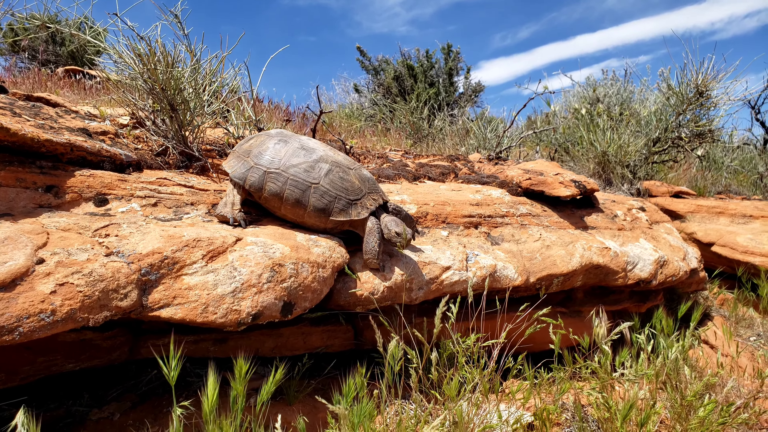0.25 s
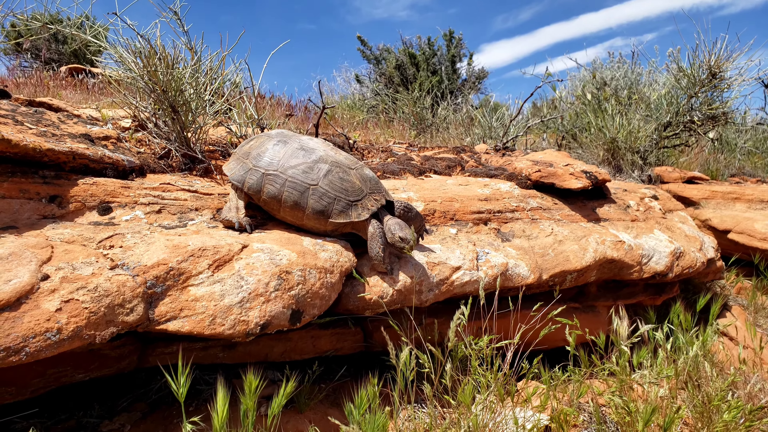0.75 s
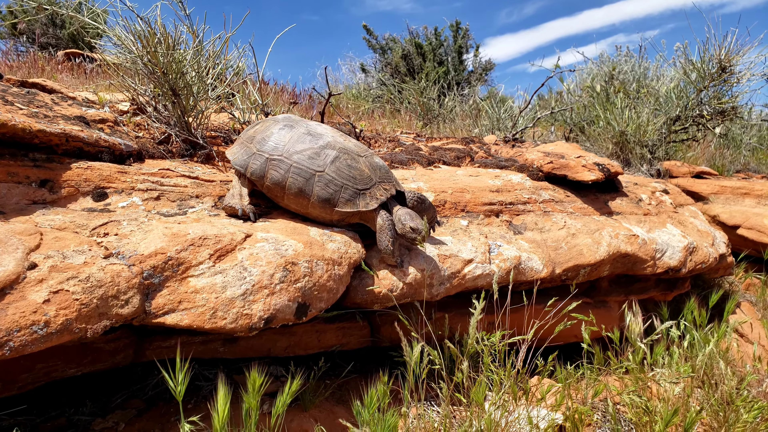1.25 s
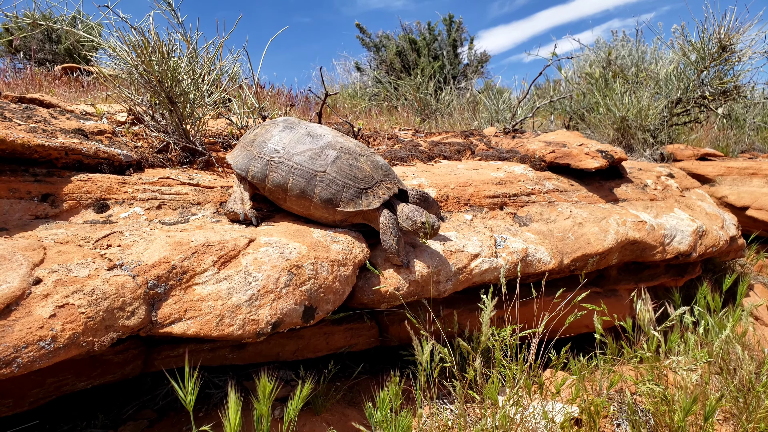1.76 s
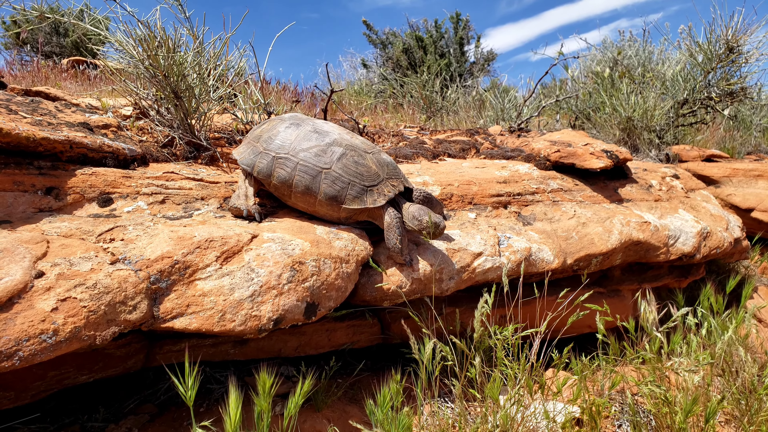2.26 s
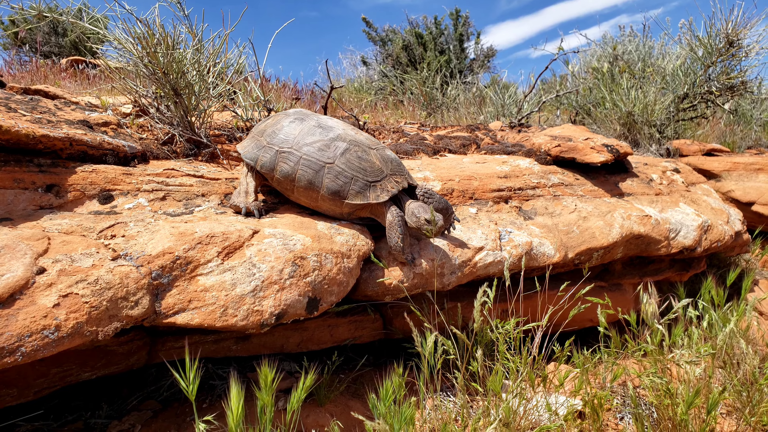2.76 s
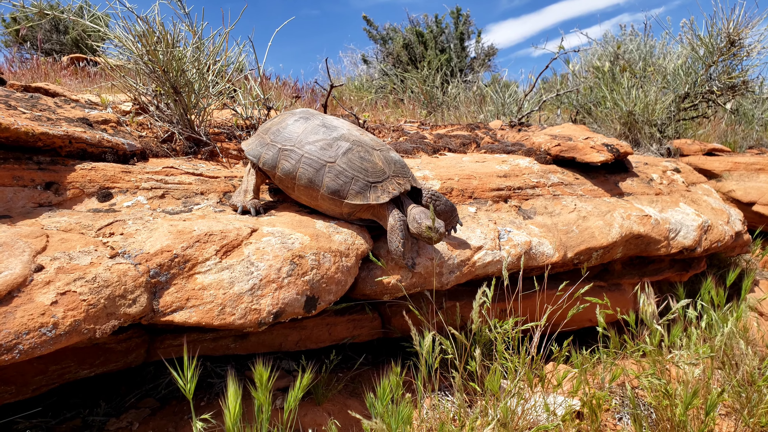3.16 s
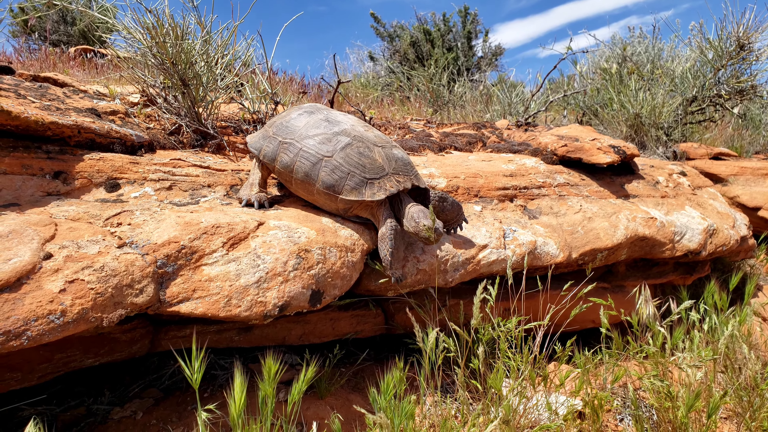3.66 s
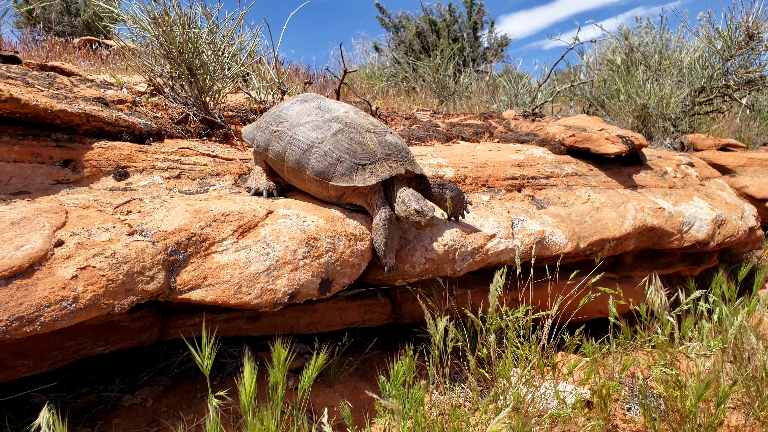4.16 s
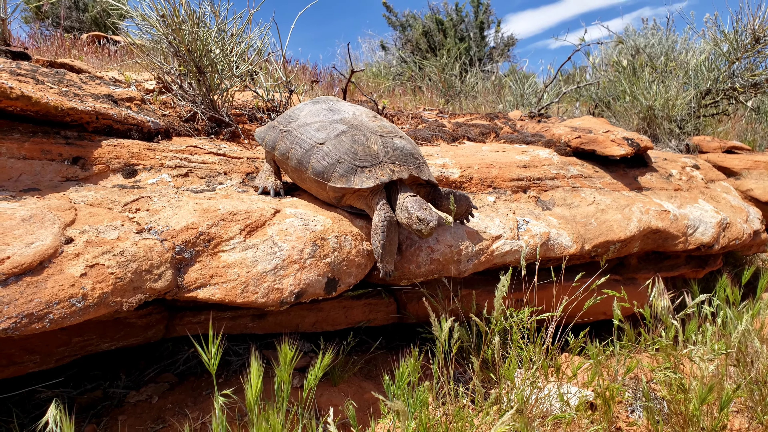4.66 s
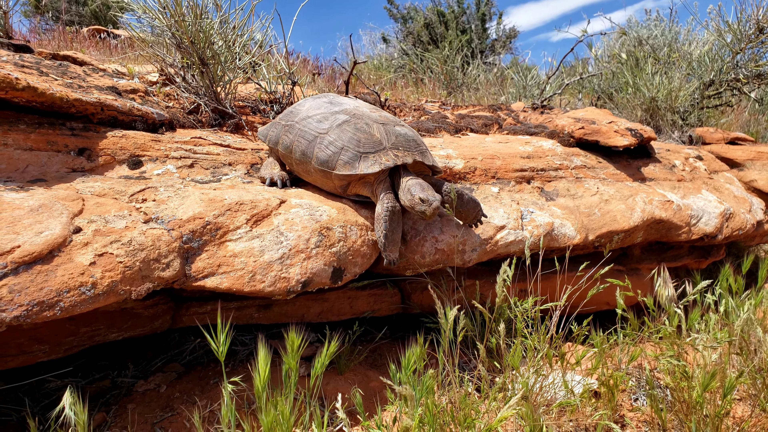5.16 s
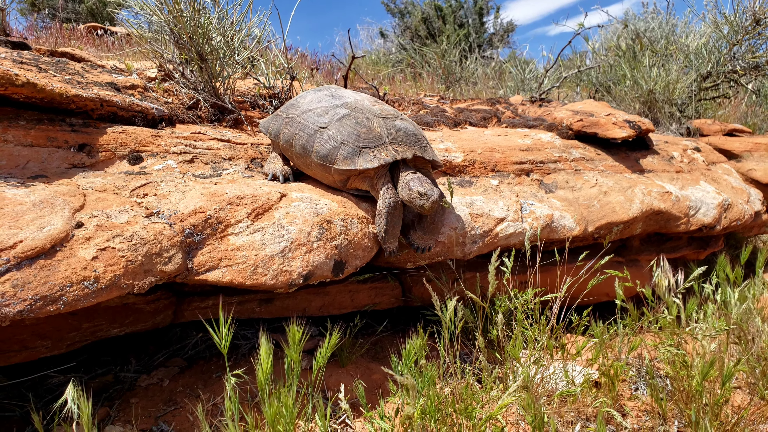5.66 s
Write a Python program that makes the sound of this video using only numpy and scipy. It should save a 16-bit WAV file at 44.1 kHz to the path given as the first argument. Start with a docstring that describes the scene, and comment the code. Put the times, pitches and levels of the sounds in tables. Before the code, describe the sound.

Quiet desert air with thin hiss, a faint wavering low drone and soft wind rumble. Close, dry claws skid and click on grainy rock: strongest at the very start, nearly silent for a while, busier near three seconds, again near five. A far, short gliding bird whistle sits mostly left. Wind flutters unevenly across the two microphone sides, then buffets loudly, deep and ragged, in the last half second.

```python
"""Open desert, a sandstone ledge: a tortoise creeps down it, its claws skidding and ticking over the grains.
Slides are bursts of random grain hits made to ring; ticks, shell taps and crunches are sharp knocks
with a crumbling tail, and the slope gives all of these a faint wash. A far bird whistles four times in gliding
tones. Filtered noise makes the air, and the wind rumbling on two microphone ports over a distant drone of
wavering tones; it ends in a gust that thumps the left port with short, ragged swings."""
import sys
import numpy as np
from scipy import signal
from scipy.fft import rfft, irfft
from scipy.io import wavfile
from scipy.ndimage import uniform_filter1d

SR = 44100
rng = np.random.default_rng(int(sys.argv[2]) if len(sys.argv) > 2 else 0)


def dump(signal):
    """Clip the signal to [-1, 1] and save it as 16-bit WAV at the path in sys.argv[1]."""
    limited = np.clip(np.atleast_2d(signal).T, -1, 1)
    pcm = np.round(limited * 32767).astype(np.int16)
    wavfile.write(sys.argv[1], SR, pcm)


N = 261065
TIME, FREQ = np.arange(N) / SR, np.fft.rfftfreq(N, 1 / SR)

# A claw or the shell sliding on stone. Each row: start in seconds, length in seconds, grit level in dB,
# grit pitch in Hz, ring minus grit in dB, rasp minus grit in dB (levels before the later gains and filters).
SLIDES = [(0.008, 0.046, -69, 12500, -19, -24), (0.059, 0.013, -41, 12330, -16.5, -25),
          (0.1087, 0.0045, -39.5, 12800, -25, -34), (0.133, 0.0097, -46, 11450, -10.5, -31),
          (0.145, 0.018, -71.5, 12000, 3, -4), (0.2662, 0.01, -45, 11600, -4, -14),
          (0.59, 0.15, -79.5, 11500, -12, -12), (1.13, 0.27, -86, 11800, -7.5, -9),
          (1.767, 0.018, -53, 11440, -4, -12), (1.777, 0.083, -80.5, 11600, -0.5, 3.5),
          (2.535, 0.023, -52.5, 11170, -7, -13), (2.606, 0.058, -70, 11800, -7, -8.5),
          (2.67, 0.045, -73.5, 11900, -8, -19), (2.877, 0.02, -74.5, 11400, -12, -15),
          (2.907, 0.024, -62.5, 11300, -11, -18), (2.939, 0.036, -62.5, 11400, 0, -8),
          (3.164, 0.03, -62.5, 11900, -11, -10.5), (3.233, 0.023, -58.5, 11200, -4, -11),
          (3.252, 0.032, -66.5, 11300, -0.5, -7), (3.26, 0.16, -79, 12100, -14, -10.5),
          (3.328, 0.02, -69.5, 11500, -19, -16), (3.413, 0.07, -66, 11400, -12, -12),
          (3.50, 0.23, -80.5, 12400, -0.5, -3.5), (3.845, 0.05, -75.5, 11600, -1.5, -6),
          (4.566, 0.12, -82.5, 11900, -13, -2), (5.015, 0.042, -61, 12000, -19, -20),
          (5.041, 0.061, -58.5, 10800, -6.5, -15), (5.103, 0.03, -81, 11600, 4, -8),
          (5.202, 0.082, -83, 11100, -1.5, -5), (5.262, 0.046, -72, 11400, -4.5, -14),
          (5.627, 0.083, -75.5, 11700, -9.5, -13), (5.7, 0.0049, -59, 11800, -19, -14),
          (5.712, 0.125, -74, 11900, -17, -27), (5.765, 0.021, -70, 11660, -8.5, -18.5),
          (5.827, 0.04, -72.5, 11800, -16, -12), (5.877, 0.054, -66, 12200, -15, -23)]


def undb(db):
    """Turn decibels into a gain."""
    return 10 ** (np.asarray(db) / 20)


def unit(x):
    """Scale to an rms (average strength) of 1."""
    return x / np.sqrt(np.mean(x ** 2))


def across(points):
    """Read a table of (Hz, value) at every frequency, evenly in pitch."""
    hz, value = np.transpose(points)
    return np.interp(np.log(FREQ + 1), np.log(hz), value)


def response(points):
    """Make a filter of unit power gain from (Hz, dB) points; it never sounds ahead of its input."""
    cepstrum = irfft(np.log(unit(undb(across(points)))), N)
    # Folding the second half onto the first puts all of the filter's ringing after the input.
    cepstrum[1:N // 2] *= 2
    cepstrum[N // 2:] = 0
    return np.exp(rfft(cepstrum))


def through(x, gain):
    """Filter a sound by a gain for each frequency."""
    return irfft(rfft(x) * gain, N)


def resonate(x, hz, width_hz):
    """Pass a sound through one resonance, gain 1 at its centre."""
    band = [hz - width_hz / 2, hz + width_hz / 2]
    return signal.sosfilt(signal.butter(1, band, "band", fs=SR, output="sos"), x)


def add(track, s, sound):
    """Mix a sound into the track at s seconds."""
    start = max(int(s * SR), 0)
    part = sound[:max(N - start, 0)]
    track[start:start + len(part)] += part


def walk(rate):
    """Drift smoothly and randomly around 0, with a new random target `rate` times a second."""
    k = int(SR / rate)
    steps = np.repeat(rng.standard_normal(N // k + 1), k)
    return 0.95 * uniform_filter1d(uniform_filter1d(steps, k), k)[:N]


def swell(middle, length):
    """Half a sine wave: up from 0 to 1 and down again."""
    return np.cos(np.pi * np.clip((TIME - middle) / length, -.5, .5))


def ports(side_db):
    """Gains of the left and right port for a left minus right difference, with unit mean power."""
    return unit(undb([[side_db / 2], [-side_db / 2]]))


def air(level_db=-76.5, right_hiss_db=2):
    """Quiet open air: smooth filtered noise, its high hiss a little stronger on the right."""
    # Colour of still air and hiss. Each row: frequency in Hz, relative level in dB.
    air_colour = [(35, -16), (60, -11.5), (100, -9), (171, -14), (285, -21.5), (475, -35), (657, -34.5),
                  (1150, -40.5), (1790, -40), (5980, -46.5), (7720, -58.5), (10200, -44.5), (11700, -39.5),
                  (13800, -39), (15500, -61)]
    colour = response(air_colour)
    # level_db counts only what lies above 1000 Hz.
    colour /= np.sqrt(np.mean(abs(colour * (FREQ > 1000)) ** 2))
    right_minus_left_db = across([(6000, 0.009), (11000, right_hiss_db)])
    lean = undb(np.outer([-.5, .5], right_minus_left_db))
    return through(rng.standard_normal((2, N)), colour * lean) * undb(level_db)


def drone(gain_db=-1.5, fade_db=2, wander=0.0045, side_db=-2, base_hz=35.2, high_hz=180):
    """A far engine: only its lowest partials carry, each wavering and fading by itself in the moving air."""
    # Loudness over time. Each row: time in seconds, level in dB before the gain and fading.
    hum_level = [(.05, -90), (.4, -52), (.9, -58.5), (1.15, -70.5), (1.9, -51), (2.55, -50), (2.9, -62),
                 (3.3, -51), (3.7, -52), (4.2, -44), (4.6, -49.5), (5.2, -57)]
    # Tones of the hum. Each row: multiple of the base pitch, relative level in dB.
    partials = [(2, 0), (3, -11), (4, -14), (5, -18), (6, -26)]
    # A higher tone sings out for a while: middle in seconds, length in seconds, level in dB before the gain.
    middle, length, high_db = (3.9, 1.24, -58)

    def wavering(hz):
        """One tone of unsteady pitch and level."""
        phase = 2 * np.pi * (rng.random() + np.cumsum(hz * (1 + wander * walk(9))) / SR)
        return undb(fade_db * walk(6.2)) * np.sin(phase)

    level_db = np.interp(TIME, *np.transpose(hum_level))
    hum = sum(undb(level_db + db) * wavering(k * base_hz) for k, db in partials)
    hum += undb(high_db) * swell(middle, length) * wavering(high_hz)
    return hum * undb(gain_db) * ports(side_db)


def wind(gain_db=4, steadiness=0.44, breeze_side_db=-2, flutter_db=1.5, flutter_rate=14):
    """Each port has its own turbulent rumble; gusts ride on the breeze, many striking one port harder."""
    # Colour of the rumble. Each row: frequency in Hz, relative level in dB.
    rumble_colour = [(20, -33.5), (28, -18.5), (37, -1), (55, 7), (75, 0.5), (100, -2.5), (125, -6),
                     (160, -20.5), (200, -20.5), (300, -32), (500, -51.5), (1000, -81.5)]
    # The breeze on both ports. Each row: time in seconds, rumble in dB before the gain.
    breeze = [(0, -104), (.65, -62.5), (1.2, -81.5), (1.7, -83), (2.3, -56), (2.6, -59), (2.95, -87),
              (3.3, -60.5), (4.5, -60.5), (5.15, -67.5), (5.92, -54)]
    # Gusts that swell and drop. Each row: middle in seconds, length in seconds, rumble in dB before the gain,
    # left minus right in dB.
    gusts = [(0.111, 0.068, -63, 0), (0.364, 0.25, -51.5, -3), (1.818, 0.03, -50.5, 1),
             (2.283, 0.066, -51, 1), (2.749, 0.15, -54, -6.5), (3.204, 0.024, -51.5, 24),
             (3.299, 0.13, -48, 8), (3.476, 0.075, -43.5, 27), (3.626, 0.071, -48, 24),
             (3.795, 0.35, -61, 6), (4.01, 0.03, -46.5, -30), (4.19, 0.25, -45, 11), (4.653, 0.24, -51, 9),
             (4.81, 0.061, -47.5, 29), (5.248, 0.095, -46.5, 33), (5.368, 0.079, -43.5, -10),
             (5.484, 0.24, -43.5, 1.5), (5.648, 0.27, -31, 5), (5.807, 0.14, -33.5, -6.5),
             (5.912, 0.16, -30.5, 15)]
    power = (undb(np.interp(TIME, *np.transpose(breeze))) * ports(breeze_side_db)) ** 2
    for middle, length, db, side_db in gusts:
        power += (undb(db) * ports(side_db) * swell(middle, length)) ** 2
    rumble = through(rng.standard_normal((2, N)), response(rumble_colour))
    # Partly even out the chance ups and downs of the noise.
    rumble /= uniform_filter1d(rumble ** 2, size=3000) ** (steadiness / 2)
    flutter = flutter_db * np.array([walk(flutter_rate), walk(flutter_rate)])
    return rumble * np.sqrt(power) * undb(gain_db + flutter)


def contact(grit, ring_s):
    """A touch of claw on stone: a sharp start with its own brief, uneven ring."""
    touch = grit * rng.standard_normal(256) * np.exp(-TIME[:256] / ring_s)
    touch[0] = 1
    return touch / np.sqrt(np.sum(touch ** 2))


def scrapes(grit_db=1, ring_db=-0.5, press_rise=0.42, press_fall=0.43,
            zing_db=-4, zing_width_hz=450, grit_width_hz=4000, grit_floor_hz=9600,
            note_db=-6, note_width_hz=260, note_share=0.493, firm_level_db=-41.5,
            trickle_db=-24, trickle_s=0.054, trickle_top_db=-78):
    """Slides swell and ease, breaking sand grains in clumps as the claw sticks and slips; sand trickles after.

    Bright grit zings at each stroke's pitch; the claw's ring narrows to a note in firm strokes; stone rasps below.
    """
    # Colour of the ring of a sliding claw. Each row: frequency in Hz, relative level in dB.
    ring_colour = [(3000, -23.5), (4200, 1), (4900, 4), (5700, 1.5), (6400, 6.5), (7300, -6), (8300, -16),
                   (12000, -24), (15000, -37.5)]
    # Colour of the rasp of the stone under it. Each row: frequency in Hz, relative level in dB.
    rasp_colour = [(200, -28.5), (550, -8.5), (900, -10), (1550, 1.5), (2300, -6.5), (3300, 1.5), (4200, 2),
                   (6000, 4), (12000, -44)]
    spread_db, slip_db, slip_rate = 4, 4.2, 300
    first_grains, grains_per_s, dust = 45, 420, 0.3
    # Every grain has its own size and pushes either way.
    size = undb(spread_db * np.minimum(rng.exponential(size=N), 3.5)) * rng.choice([-1, 1], N)
    chance, powder = rng.random(N), rng.standard_normal(N)
    slip = undb(slip_db * walk(slip_rate))
    grit, ring, rasp = np.zeros((3, N))
    fine = signal.butter(6, grit_floor_hz, "high", fs=SR, output="sos")
    for s, length, db, hz, claw_db, stone_db in SLIDES:
        span = (TIME >= s - length / 2) & (TIME < s + length + 2 * trickle_s)
        begins, t = TIME[span][0], TIME[span] - s
        trickle_gain = undb(min(trickle_db, trickle_top_db - db))
        trickle = trickle_gain * np.clip(t / length, 0, np.exp((length - t) / trickle_s))
        press_width = np.where(t < length / 2, press_rise, press_fall)
        press = np.exp(-((t / length - .5) / press_width) ** 2) + trickle
        breaks = chance[span] < (first_grains / length + grains_per_s) / SR
        grains = unit(size[span] * breaks) + dust * powder[span]
        burst = np.convolve(grains * slip[span] * press, contact(grit=0.2, ring_s=0.00075))
        bright = signal.sosfilt(fine, burst)
        firm = min(undb(db - firm_level_db), 1) ** .5
        # The claw's own note is a fixed share of the grit pitch.
        note = undb(note_db) * firm * unit(resonate(burst, note_share * hz, note_width_hz))
        zing = undb(zing_db) * resonate(bright, hz, zing_width_hz)
        gain = undb(db) * np.sqrt(length * SR / len(burst))
        add(grit, begins, gain * unit(resonate(bright, hz, grit_width_hz) + zing))
        add(ring, begins, gain * undb(claw_db) * (unit(burst) + note) / (1 + firm))
        add(rasp, begins, gain * undb(stone_db) * unit(burst))
    ring = undb(ring_db) * through(ring, response(ring_colour))
    return undb(grit_db) * grit + ring + through(rasp, response(rasp_colour))


def ledge(x, near_db=-11, near_s=0.0015, wash_db=-19, wash_t60=0.48, port_lag_s=1.3e-5):
    """Direct sound at two ports, the right later, quick reflections, and a thin wash from rocks and brush."""
    # How the two ports hear the ledge. Each row: frequency in Hz, left minus right in dB.
    port_balance = [(1000, -2), (3000, 14), (5800, 3.5), (9000, 3.5), (11000, -10.5), (12500, -13.5),
                    (14000, -6.5)]
    balance = undb(np.outer([.5, -.5], across(port_balance)))
    delay = np.exp(2j * np.pi * np.outer([.5, -.5], FREQ) * port_lag_s)
    near = unit(rng.standard_normal((2, N)) * np.exp(-TIME / near_s)) / np.sqrt(N)
    # The wash builds up quickly, then falls by 60 dB in wash_t60 seconds.
    fall = np.exp(-np.log(1000) * TIME / wash_t60) * (1 - np.exp(-TIME / 0.0089))
    tail = unit(rng.standard_normal((2, N)) * fall) / np.sqrt(N)
    close = balance * (delay + undb(near_db) * rfft(near))
    wash = np.sqrt(balance) * undb(wash_db) * rfft(tail)
    return through(x, close + wash)


def clicks(table, colour, gain_db, crumble, crumble_s):
    """A sharp contact and a short, dying crumble of noise after it, filtered to the colour."""
    force, t = np.zeros(N), TIME[:SR // 20]
    for s, db in table:
        hit = crumble * rng.standard_normal(len(t)) * np.exp(-t / crumble_s)
        hit[0] = 1
        add(force, s, undb(db + gain_db) * hit)
    return through(force, response(colour))


def stray_ticks(count=22, above_db=24, top_db=-48, scatter_db=3):
    """Rows of faint ticks at chance moments while a claw drags, stronger in harder drags."""
    effort = sum(undb(db) * (TIME > s) * (TIME < s + length) for s, length, db, *_ in SLIDES)
    moments = np.quantile(TIME[effort > 0], rng.random(count), method="nearest")
    effort_db = 20 * np.log10(np.interp(moments, TIME, effort))
    strength_db = np.minimum(effort_db + above_db, top_db)
    return list(zip(moments, strength_db + scatter_db * rng.standard_normal(count)))


def claw_ticks():
    """A claw tip snapping off a grain makes a sharp, bright knock; faint stray ticks join the drags."""
    # The snaps. Each row: time in seconds, strength in dB before the gain and filter.
    snaps = [(0.0194, -35), (0.0425, -44), (0.0618, -18), (0.0657, -17), (0.0919, -21.5), (0.1058, -28),
             (0.1101, -19), (0.1142, -30), (0.1403, -27), (0.2935, -25.5), (0.6108, -35), (0.656, -39),
             (1.237, -43), (1.443, -47), (1.6948, -42), (2.213, -40), (2.6893, -34.5), (2.912, -34.5),
             (2.9435, -32), (2.9574, -22.5), (2.9618, -33), (3.121, -49), (3.1818, -25.5), (3.264, -30),
             (3.275, -33.5), (3.432, -41), (5.0245, -26), (5.0415, -32), (5.063, -33), (5.0727, -25),
             (5.218, -52), (5.7005, -40), (5.7705, -47), (5.8025, -40.5), (5.9025, -46)]
    # Colour of a sharp tick. Each row: frequency in Hz, relative level in dB.
    tick_colour = [(500, -50), (1400, -18.5), (3000, -31), (5600, -12), (7700, -44.5), (9500, -6),
                   (11500, 1), (13000, -12), (15000, -8)]
    return clicks(snaps + stray_ticks(), tick_colour, gain_db=-7.5, crumble=0.29, crumble_s=0.0015)


def shell_taps():
    """The shell knocks dully on the ledge and rings in its own colour."""
    # The taps. Each row: time in seconds, strength in dB before the gain and filter.
    taps = [(.350, -53), (1.987, -56.5), (2.300, -57), (2.534, -58), (2.943, -70)]
    # How the shell rings. Each row: frequency in Hz, relative level in dB.
    shell_colour = [(400, -9), (1300, 31), (2500, 14), (4000, 21.5), (6000, 21), (12000, -62)]
    return clicks(taps, shell_colour, gain_db=6.5, crumble=0.11, crumble_s=0.0042)


def bird(gain_db=1, side_db=12, dip_db=-14, echo_db=-12, echo_s=0.038, fade_in_s=0.022, release_s=0.0092):
    """Arched whistles start softly, end on an accent; mid-note the two syrinx sides part, weaken and flutter."""
    # The whistles. Each row: start in seconds, length in seconds, top pitch in Hz, pointedness of the arch,
    # level in dB before the gain, accent in dB, parting of the two voices from 0 to 1, lower voice in dB.
    whistles = [(0.938, 0.137, 3076, 0.86, -70, 3.5, 0.32, -13),
                (1.738, 0.27, 3600, 1.06, -81, 12, 0.65, 7),
                (2.611, 0.219, 3200, 0.79, -75.5, 11.5, 0.8, -5.5),
                (5.588, 0.065, 2940, 0.64, -85.5, 10, 0.4, -17.5)]
    start_hz, end_hz, low_voice_hz = 2860, 2640, 2730
    accent_lead_s, accent_width_s = 0.017, 0.013  # the push just before a whistle ends
    rasp_hz, flutter_db = 190, 4
    song = np.zeros(N)
    # Each voice has its own unsteady pitch and level.
    wobble = [(rasp_hz * walk(600), flutter_db * walk(220)) for _ in range(2)]
    for s, length, top_hz, pointed, db, accent_db, parting, low_voice_db in whistles:
        t = TIME[TIME < length]
        arch = np.sin(np.pi * t / length)
        edge = start_hz + (end_hz - start_hz) * t / length
        apart = np.clip(parting, 0, 1) * np.minimum(2 * arch ** 3, 1)
        accent = accent_db * np.exp(-((length - accent_lead_s - t) / accent_width_s) ** 2)
        high = edge + (top_hz - edge) * arch ** pointed, undb(accent + dip_db * apart)
        low = low_voice_hz, undb(low_voice_db) * apart * arch ** 4
        voiced = np.minimum(t / fade_in_s, 1) * np.minimum((length - t) / release_s, 1)
        now = int(s * SR) + np.arange(len(t))
        for (hz, gain), (rasp, flutter) in zip((high, low), wobble):
            phase = 2 * np.pi * np.cumsum(hz + apart * rasp[now]) / SR
            level = undb(db + gain_db + apart * flutter[now])
            add(song, s, voiced * gain * level * np.sqrt(2) * np.sin(phase))
    # The slope answers with a short echo of dying noise.
    slope = unit(rng.standard_normal((2, N)) * np.exp(-TIME / echo_s)) / np.sqrt(N)
    return song * ports(side_db) + through(song, undb(echo_db) * rfft(slope))


def sand_crunches():
    """A few coarse grains give way under a slowly dragged foot, each with a longer crumble than a tick."""
    # The crunches. Each row: time in seconds, strength in dB before the filter.
    crunches = [(3.540, -66), (3.5452, -56), (3.5702, -60), (3.6026, -64), (3.6136, -60), (3.628, -58),
                (3.646, -57), (3.6899, -53.5), (3.702, -57.5), (3.7458, -55)]
    # Colour of a crunch. Each row: frequency in Hz, relative level in dB.
    crunch_colour = [(500, -20), (1400, -1.5), (3000, -6), (4500, -3.5), (6200, 2.5), (7800, -17),
                     (10000, -3), (12500, 3), (15000, -0.5)]
    return clicks(crunches, crunch_colour, gain_db=0.0, crumble=0.28, crumble_s=0.0074)


def thumps(rise_s=0.0025, steepen=0.5, tatter_hz=450, low_hz=36, top_hz=680, right_db=-28):
    """An eddy shoves the diaphragm steeply; it swings back under ragged air, more ragged in quick eddies."""
    # Eddies that thump the left port. Each row: time in seconds, strength in dB before the filter, pitch in Hz,
    # decay in seconds (half the width of the fall), raggedness from 0 to 1 before scaling by pitch.
    eddies = [(5.5997, -9, 98, 0.0061, 0.5), (5.678, -13, 217.6, 0.002, .6), (5.685, -14, 61, 0.0074, .5),
              (5.7035, -8, 149, 0.0045, 0.75), (5.7236, -13.5, 190, 0.003, 0.2),
              (5.727, -14.5, 60, 0.0084, 0.5), (5.823, -21.5, 148.5, 0.0031, 0.4),
              (5.883, -15, 170, 0.0027, 0.18), (5.898, -18.5, 82, 0.006, 0.5)]
    out, t = np.zeros(N), TIME[:SR // 10]
    soften = signal.butter(3, tatter_hz, fs=SR, output="sos")
    for s, db, hz, decay, tatter in eddies:
        ragged = unit(signal.sosfilt(soften, rng.standard_normal(len(t))))
        push = (1 - np.exp(-(t / rise_s) ** 2)) * np.exp(-(t / (2 * decay)) ** 2)
        phase = 2 * np.pi * hz * t
        swing = np.sin(phase - steepen * push * np.sin(phase))
        add(out, s, undb(db) * push * (swing + tatter * hz / tatter_hz * ragged))
    band = signal.butter(2, [low_hz, top_hz], "band", fs=SR, output="sos")
    out = signal.sosfiltfilt(band, out)
    return np.outer([1, undb(right_db)], out)


def scene():
    """The tortoise on its ledge, the bird and the weather."""
    weather = air() + drone() + wind() + thumps()
    tortoise = scrapes() + claw_ticks() + shell_taps() + sand_crunches()
    return weather + ledge(tortoise) + bird()


def record(dry, top_hz=14600):
    """The recorder cuts the treble above top_hz."""
    return signal.sosfilt(signal.ellip(8, .2, 70, top_hz, fs=SR, output="sos"), dry)


dry = scene()
out = record(dry)
dump(out)
```